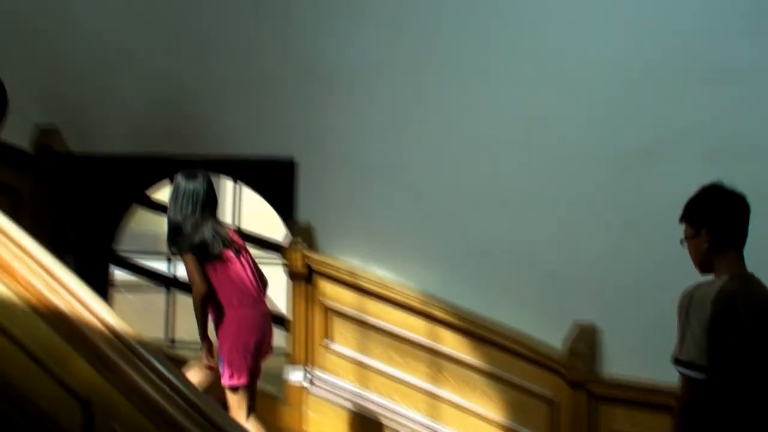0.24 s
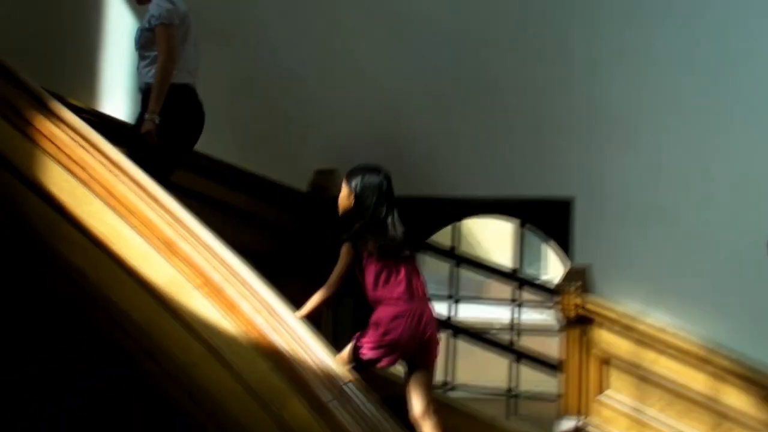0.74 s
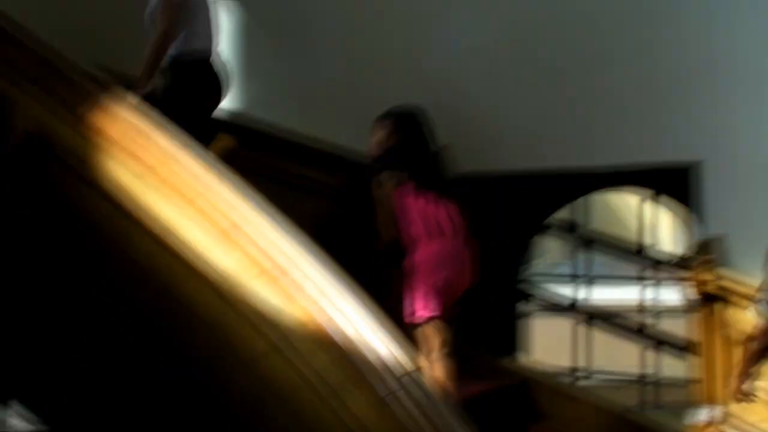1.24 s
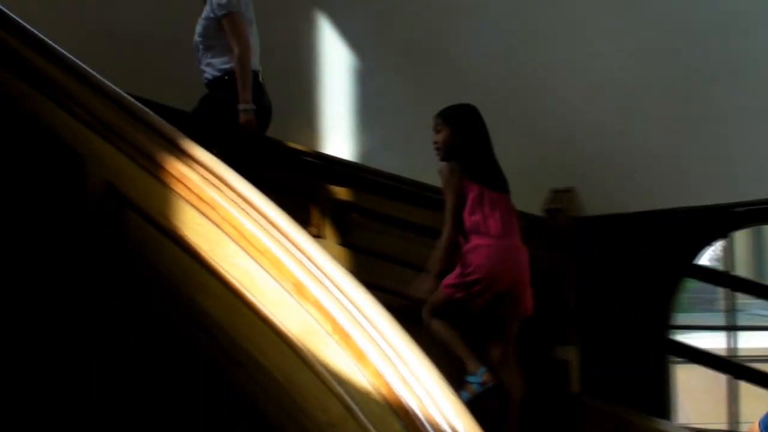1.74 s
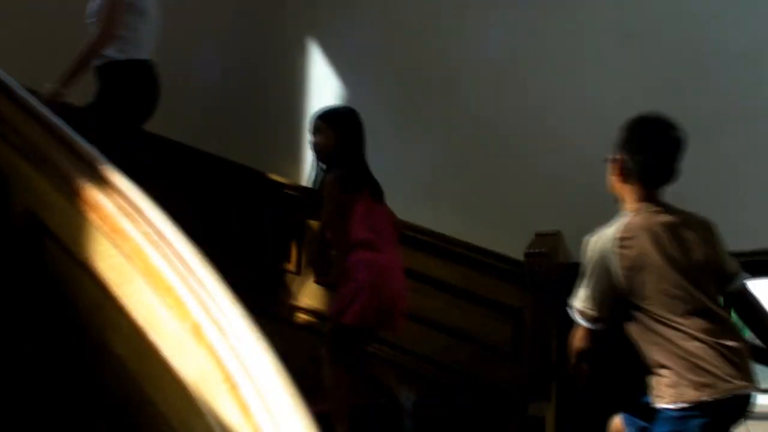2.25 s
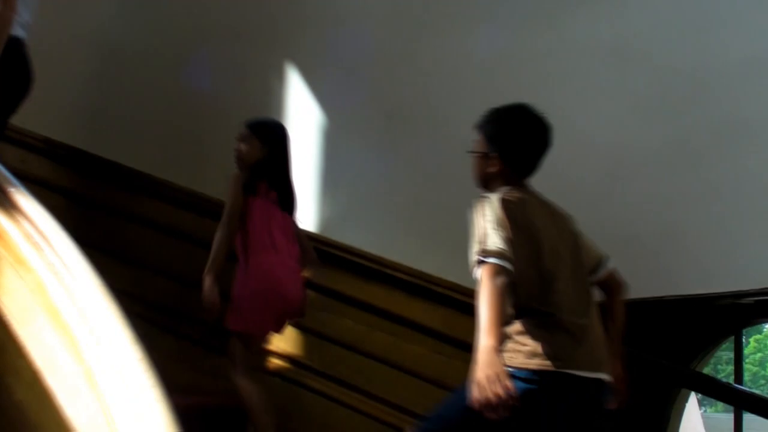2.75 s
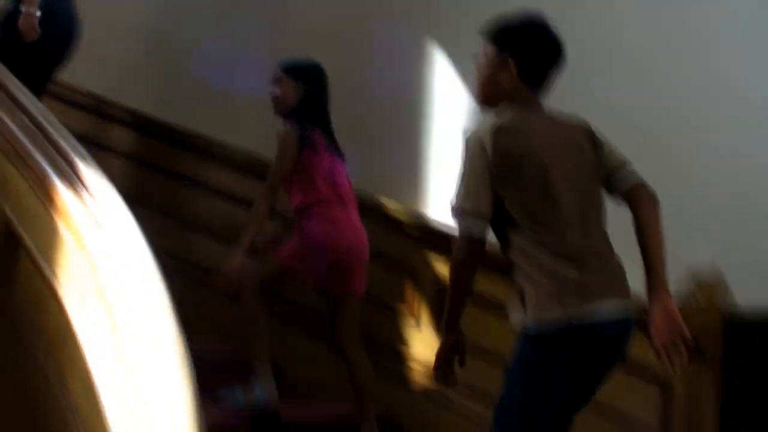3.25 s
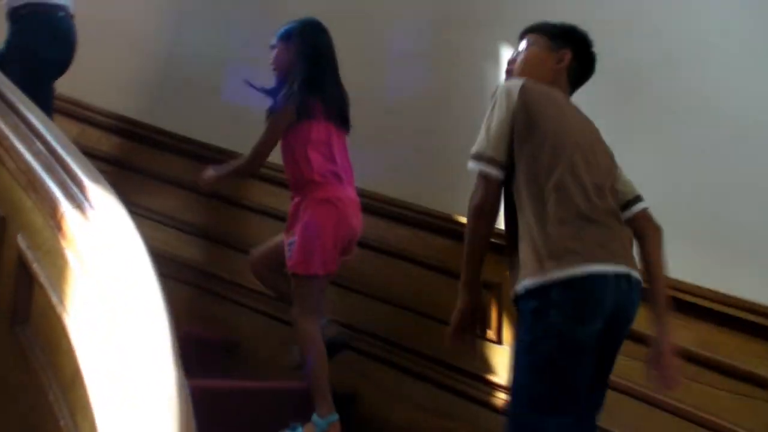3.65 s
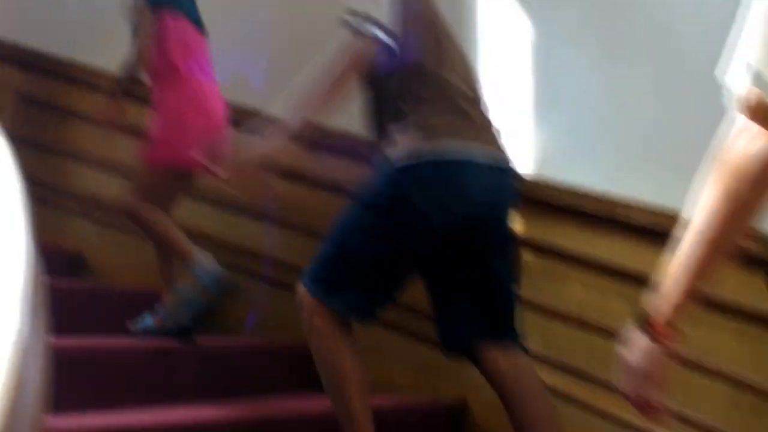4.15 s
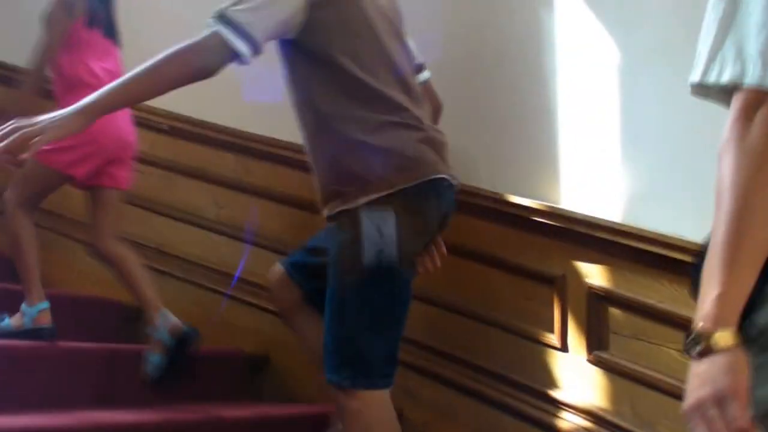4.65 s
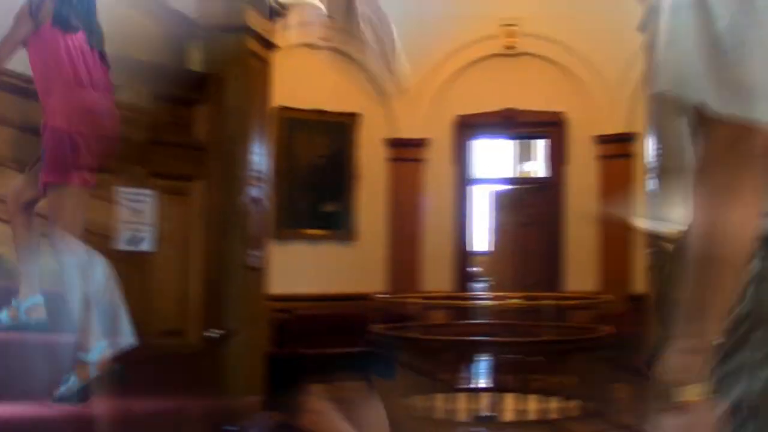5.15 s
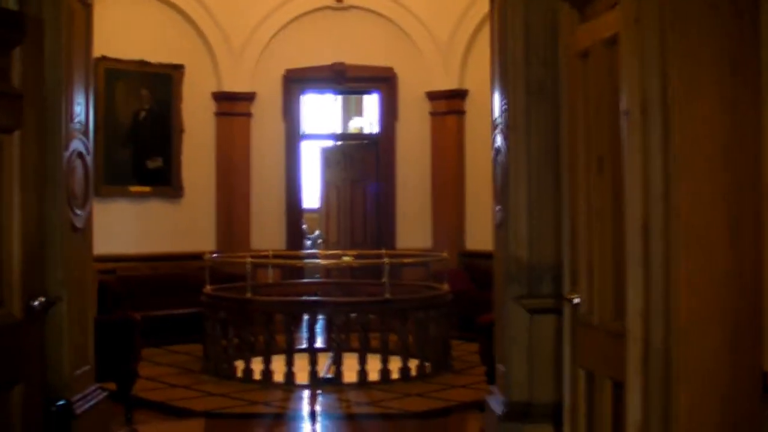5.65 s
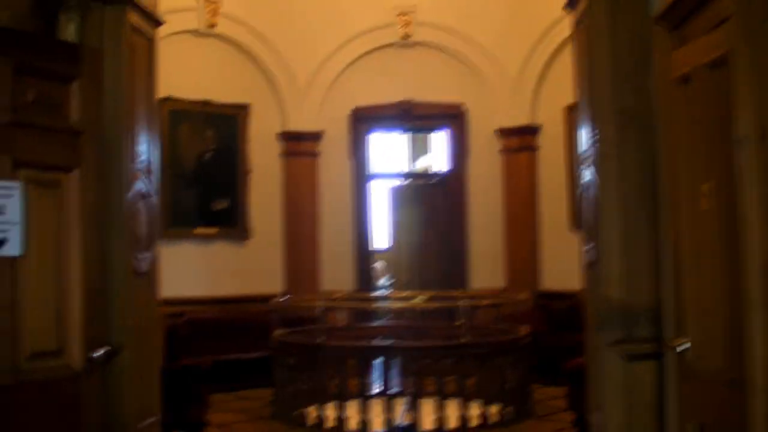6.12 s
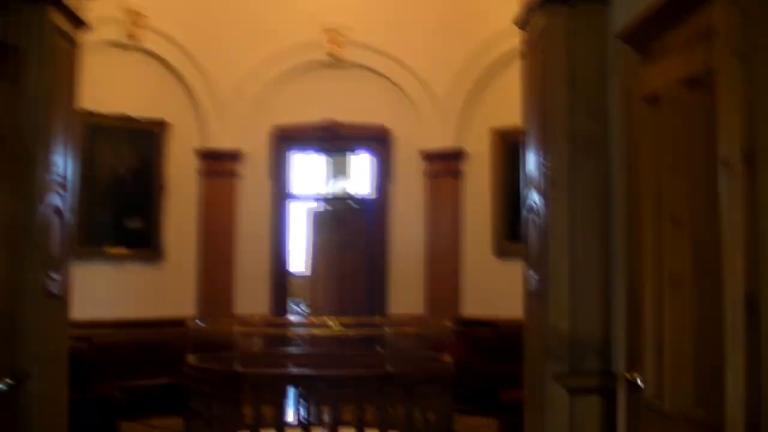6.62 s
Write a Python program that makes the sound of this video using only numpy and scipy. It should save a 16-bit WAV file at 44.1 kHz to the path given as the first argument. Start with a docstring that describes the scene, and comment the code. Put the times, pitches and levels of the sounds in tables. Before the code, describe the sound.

Several people climb a carpeted wooden staircase in a large echoing building, dull hollow footfalls, shoe clacks and scuffs, one heaviest step near five seconds.

```python
"""Footfalls of several people on a carpeted wooden staircase in a large, echoing building: each is a sum of
a noise slap, decaying tread modes (the knock) and decaying modes of the hollow flight (the boom).
Shoes add resonant clacks and ticks, noise scuffs, squeaks, and crunches made of runs of tiny snaps.
Behind them filtered noise gives a dull shuffle and wash, rustles and hiss; decaying noise gives the echo.
The level dips briefly near five seconds, after which the bass is thin and fills in."""
import sys
import numpy as np
from scipy import signal
from scipy.fft import rfft, irfft
from scipy.io import wavfile
from scipy.ndimage import uniform_filter1d

SR = 44100
rng = np.random.default_rng(int(sys.argv[2]) if len(sys.argv) > 2 else 0)


def wav_out(sig):
    """Save sig, one row per channel (or a flat mono array), as 16-bit PCM at SR to the path in sys.argv[1]."""
    wavfile.write(sys.argv[1], SR, np.round(np.clip(np.atleast_2d(sig).T, -1, 1) * 32767).astype(np.int16))


N = 303408
TIME = np.arange(N) / SR
AGE = TIME[:16384]  # seconds since the start of a single event

# Level of the low shuffle and the high rustle behind the steps, with the wash of echo after heavy steps.
# Each row: time in seconds, shuffle and wash in dB, rustle in dB, before gains and wavering.
BACKGROUND_LEVELS = [(0.0, -43, -46.5), (0.4, -45.5, -52.5), (0.75, -41.5, -50), (1.21, -43, -50),
                     (1.77, -45.5, -53), (1.99, -33.5, -46), (2.26, -44.5, -51.5), (2.53, -38.5, -48.5),
                     (3.29, -44.5, -48), (4.25, -44, -52), (4.46, -37, -51), (4.68, -42.5, -53),
                     (5.67, -45, -47.5), (5.92, -43, -54.5), (6.65, -43, -45.5), (6.88, -41.5, -53)]
# Spectrum of the air of the hall. Each row: frequency in Hz, relative density in dB per Hz.
HALL_AIR = [(25, -29), (50, -9), (75, -7), (100, 4.5), (135, 3.5), (185, 3), (260, -5), (400, 6.5),
            (600, -1.5), (1000, -4.5), (2000, -6), (4000, -11.5), (7000, -18), (12000, -34.5), (14500, -36)]
# Centres in Hz of the bands in which the shuffle swells and fades separately.
SHUFFLE_CENTRES_HZ = 2. ** np.arange(8, 11.5, .5)
# Reverberation of the hall. Each row: frequency in Hz, decay time t60 in seconds.
HALL_DECAY = [(100, 1.72), (400, 0.57), (1500, 0.99), (4000, 0.26), (12000, 0.97)]
# Air resonances of the narrow stairwell. Each row: frequency in Hz, peak gain in dB, t60 in seconds.
STAIRWELL_MODES = [(168, -5, 0.65), (404, -2.5, 0.62)]
# Stereo width of the diffuse sound. Each row: frequency in Hz, side gain in dB.
DIFFUSE_SIDE = [(40, -6), (110, -18), (250, -14.5), (500, -13.5), (1000, -12.5), (2000, -7.5), (4000, -3),
                (8000, 0.5)]
# Stereo width of the direct sound. Each row: frequency in Hz, side gain in dB.
DIRECT_SIDE = [(40, -14), (110, -41), (200, -50), (400, -29), (700, -23), (1300, -15), (2400, -12),
               (4400, -3.5), (8000, 0)]
# A shoe squeaks faintly as it turns.
# Each row: loudest moment in seconds, level in dB, length in seconds, pitch in Hz.
SHOE_SQUEAKS = [(.18, -44, .008, 5250), (1.245, -47, .012, 3620), (5.155, -45.5, .055, 1090),
                (6.75, -50, .07, 3500)]
# Soles brush the carpet.
# Each row: loudest moment in seconds, level in dB, rise time in seconds, resonance in Hz.
SOLE_SCUFFS = [(0.278, -45, 0.072, 940), (0.819, -46, 0.15, 3560), (1.243, -47.5, 0.016, 3600),
               (1.412, -48, 0.057, 4660), (1.98, -44, 0.017, 2380), (2.23, -51, 0.013, 13000),
               (2.539, -40, 0.025, 2650), (2.652, -49, 0.068, 900), (2.995, -57, .02, 13000),
               (3.233, -47, 0.018, 2200), (3.238, -52, 0.073, 12000), (3.395, -51, 0.023, 12100),
               (3.794, -38.5, 0.034, 1990), (3.8, -53, 0.026, 12000), (4.406, -40.5, 0.03, 2200),
               (4.472, -38, 0.016, 1800), (4.588, -47, 0.068, 3480), (5.024, -37, 0.0079, 1990),
               (5.116, -39, 0.098, 2470), (5.57, -44, 0.027, 3400), (5.659, -52.5, 0.03, 4160),
               (5.252, -48, 0.079, 950), (5.714, -43.5, 0.14, 1270), (6.121, -42, 0.14, 710),
               (6.206, -52, 0.028, 8900), (6.455, -45.5, 0.077, 3100)]
# Soles crunch as they grip under load.
# Each row: start in seconds, level in dB, length in seconds, middle pitch in Hz.
SOLE_CRUNCHES = [(1.572, -44, .04, 1300), (1.823, -36, 0.063, 1050), (1.925, -41, 0.032, 1100),
                 (1.993, -37, .04, 850), (1.964, -37, 0.068, 1800), (2.117, -47, .04, 1500),
                 (2.589, -39, 0.02, 1500), (2.61, -40.5, .03, 1590), (2.633, -41, 0.095, 1900),
                 (3.224, -41, 0.051, 2000), (3.791, -42, 0.035, 1200), (4.234, -46, .035, 1090),
                 (4.384, -41, 0.057, 1490), (4.46, -44, 0.024, 2200), (5.023, -31, .013, 1880),
                 (5.05, -42, .03, 2200), (5.172, -41, 0.031, 1300), (6.442, -40, 0.087, 3220)]
# Sharp ticks of shoes and small hard things.
# Each row: time in seconds, crack level in dB, ring pitch in Hz, ring against crack in dB,
# brightness of the crack in dB per octave, sharpness Q of the ring.
HARD_TICKS = [(0.1728, -45.5, 5200, -0.5, 15, 11), (.6313, -46.5, 3450, 0, 0, 6),
              (1.884, -34, 4020, -1.5, 5, 3.8), (1.9626, -42, 4300, -6, 0, 4),
              (1.972, -34.5, 3030, -2, -5, 5.1), (1.982, -42, 2310, -4, -6, 5.7),
              (2.522, -35, 3380, -13, 7, 5.4), (2.543, -32.5, 3630, -4, 5, 5),
              (2.6087, -32.5, 2400, 1, 0, 5.9), (2.858, -51, 4200, -5, 12, 5),
              (3.203, -33.5, 2080, -2.5, 2, 10), (3.225, -31.5, 4170, -4, -3.5, 4.7),
              (3.2504, -39, 3960, -8, 9, 4), (3.8005, -39, 3080, -5, 2, 4),
              (4.076, -44.5, 3700, -3, 6.5, 6), (4.413, -36, 3100, -5, -12, 4),
              (4.459, -33.5, 2880, -1.5, 9.5, 5), (4.4745, -45, 2700, -5, 10, 5),
              (4.8792, -35, 1120, 0.5, -5, 9.4), (5.0102, -26.5, 1500, -5, 6, 5.5),
              (5.0263, -31.5, 3000, -11, 3.5, 4), (5.379, -49, 3130, 3.5, -1, 9.6),
              (5.445, -37, 3180, -1.5, -8, 8.8), (5.569, -38.5, 3140, -5, 0, 5.4),
              (6.189, -40, 5000, -1, 9, 6.6), (6.418, -34, 3500, -2.5, 2.5, 15),
              (6.6266, -44, 3540, -2, -1, 10), (6.678, -34, 3480, -0.5, 5.5, 12),
              (6.842, -41.5, 3100, 2, 3, 8.8)]
# Partials of a small hard part. Each row: multiple of the ring pitch, relative drive in dB.
PART_PARTIALS = [(.57, -18), (.88, 6), (1, 17.5), (1.09, -16), (1.6, 2), (2.15, -23)]
# Spectrum of a crack before its tilt. Each row: frequency in Hz, gain in dB.
CRACK_COLOUR = [(200, -15), (900, 25.5), (3500, 6), (7000, -5), (15000, -28)]
# A firm heel or toe clacks on the wood through the carpet. Each row: start in seconds, level in dB, pitch in Hz.
SHOE_CLACKS = [(.218, -45, 516), (.633, -40, 620), (1.0378, -30.5, 384), (1.042, -33, 1240),
               (1.07, -45, 420), (1.567, -39, 855), (1.591, -46, 520), (1.6985, -38.5, 764),
               (1.832, -32, 950), (1.845, -27, 533), (1.883, -26, 370), (1.926, -32.5, 1000),
               (1.986, -25.5, 480), (2.017, -37, 1710), (2.006, -32, 644), (2.13, -32.5, 453),
               (2.6084, -29, 750), (2.617, -40, 680), (2.646, -43, 500), (3.1853, -29, 546),
               (3.224, -37, 1110), (3.792, -30, 1150), (4.2415, -36, 1190), (4.24, -32, 228),
               (4.293, -29, 370), (4.393, -31, 1200), (4.4607, -36, 1010), (4.575, -29, 383),
               (4.597, -37, 710), (5.011, -34, 1700), (5.027, -28.5, 1330), (5.032, -31, 1480),
               (5.19, -34, 605), (6.4191, -29, 447), (6.4244, -28, 422), (6.491, -32.5, 525),
               (6.679, -46, 605)]
# Footfalls. Each row: heel start in seconds, knock level in dB, slap against knock in dB,
# weight on the flight against knock in dB, roll-on time of the heel in seconds,
# brightness of the knock in dB per octave, pitch of the boom in Hz, ball of the foot against heel in dB.
FOOTFALLS = [(.214, -37.5, -6.5, -4, 0.0038, -3, 147, -7), (.502, -38, -5.5, -6.5, 0.0048, 0, 172, -1.5),
             (.626, -38, -7, 0, 0.0065, -2, 156, -5), (.779, -36, -7, 2, 0.012, -20, 105, -10),
             (1.033, -32, -10, -18, 0.0041, -6, 190, -5), (1.565, -39.5, -1, -4.5, 0.0025, -10, 133, -8),
             (1.696, -55, -13, 4, 0.0023, 0, 139, -14), (1.821, -28.5, -13, 2, 0.0099, 8, 169, -5.5),
             (1.921, -31.5, -20, -6.5, 0.0041, -1, 195, -3), (1.98, -28, -17, -1.5, 0.0084, 4, 180, -6),
             (2.119, -32.5, -5.5, -10, 0.0077, -12, 185, -7), (2.416, -38.5, 1.5, 1, 0.002, 21, 135, -9),
             (2.452, -36.5, -19, -2.5, 0.0061, -18, 126, 2.5),
             (2.606, -27, -10.5, -3.5, 0.0016, 8, 138, -6), (2.675, -37, -3, -7, 0.0094, -10, 134, -13),
             (2.931, -36, -16, -8, 0.0035, -4.5, 165, -21), (3.181, -31.5, -8, -2, 0.0031, -8, 149, -5),
             (3.24, -38, 0, 8, 0.0095, 2, 137, -11), (3.545, -41, -11, 0, .0072, -2, 155, -9),
             (3.628, -39, -17, -1, 0.0026, -1, 138, -25), (3.789, -32.5, -18, 3, 0.0038, -14, 123, -8),
             (3.917, -35, -3.5, -3.5, 0.011, 0, 138, -4), (4.237, -27.5, -20, 1.5, 0.0027, -8, 168, -7.5),
             (4.373, -33.5, -3, -2.5, 0.012, -3, 140, -6.5), (4.544, -32.5, -8.5, 2, 0.0046, -22, 178, 0.5),
             (4.876, -36, -2.5, -2.5, 0.0024, 8, 155, -11), (5.002, -23, -10, -10.5, 0.007, -8, 195, -7),
             (5.029, -24.5, -23, -1.5, 0.0036, -3.5, 194, -5.5),
             (6.418, -30.5, -7, -11, .002, 6.5, 181, -8)]
# Modes of a wooden tread. Each row: frequency in Hz, relative level in dB, t60 in seconds.
TREAD_MODES = [(294, -10, 0.039), (362.5, -8.5, 0.11), (403, 0, 0.072), (451, -2.5, 0.062),
               (495, -9.5, 0.1), (546, -8, 0.068), (632, -4.5, 0.047), (745, -3.5, 0.035), (873, -3, 0.024),
               (1060, -32, 0.01)]
# Modes of the hollow flight. Each row: frequency in Hz, relative level in dB, t60 in seconds.
FLIGHT_MODES = [(67.7, -15, 0.16), (93.8, -8, 0.49), (117, -1, 0.15), (148, -3.5, 0.15), (180.5, 1, 0.09),
                (224, -0.5, 0.063), (278, 14, 0.011), (381, 1.5, 0.079)]
# Spectrum of a sole meeting the carpet. Each row: frequency in Hz, gain in dB.
SLAP_COLOUR = [(150, -16), (500, 1.5), (900, -3.5), (1400, -3), (2200, -11.5), (4000, -16), (8000, -21.5),
               (15000, -36)]

SHUFFLE_GAIN_DB, RUSTLE_GAIN_DB = -2, -1
SHUFFLE_WANDER_DB, SHUFFLE_WANDER_PER_S = 2.4, 13
# Brief rustles of clothes and soles further off; their level is set against the shuffle and wash.
RUSTLES_PER_S, RUSTLE_LENGTH_S, RUSTLE_DB, RUSTLE_SPREAD_DB = 14, .018, -5.5, 1.5
RUSTLE_HZ, RUSTLE_SPREAD_OCTAVES = 750, .55
STAIRWELL_Q, SQUEAK_Q = 4.2, 24
GRAINS_PER_S, GRAIN_DB = 320, 19
SLIPS_PER_S, SLIP_SCATTER_DB, SLIP_SPREAD_OCTAVES, SLIP_Q = 420, 3.5, .6, 4
CRUNCH_FADE_DB = -13  # strength falls by this over the run
CRACK_T60_S, TICK_RISE_S = .011, .0007
# The faint after-ring of a tick grows with the sharpness of its ring.
TICK_LINGER_DB, TICK_LINGER_T60_S, LINGER_Q = -21, 0.7, 10
CLACK_Q, CLACK_GRIT_DB, CLACK_T60_S = 1.53, -26.5, 0.038
TREAD_PIVOT_HZ = 450  # the brightness tilt leaves this frequency unchanged
BALL_DELAY_S, BALL_ROLL_S = .028, 0.00788  # the ball of the foot lands after the heel
# The weight lands later when the sole rolls on slowly.
WEIGHT_DELAY_S, WEIGHT_DELAY_PER_ROLL = .002, 1.164
FAR_STRIDE_S, FAR_STRIDE_SPREAD, FAR_STEP_DB = .6, .25, -43.5
# Gain of each source into the reverberation.
STEP_WET_DB, CLACK_WET_DB, CRUNCH_WET_DB, SCUFF_WET_DB, TICK_WET_DB = -10, -8.5, -6.5, -3.5, -5.5
DIP_START_S, DIP_END_S, DIP_DB = 5.086, 5.101, -26
# From the start of the dip the bass is thin, and it fills in after the end.
BASS_EDGE_HZ, BASS_DIP_DB, BASS_RETURN_S = 560, -13, 0.082
TOP_HZ = 15100


def undb(db):
    """Amplitude ratio: 20 dB is a factor of ten."""
    return 10 ** (np.asarray(db) / 20)


def on_log_axis(points, hz):
    """Logarithmic frequency scale: (Hz, value) points are joined by straight lines over it."""
    f, value = np.transpose(points)
    return np.interp(np.log(hz + 1), np.log(f), value)


def colour(x, points):
    """Linear filtering: a (Hz, dB) curve multiplies the spectrum."""
    n = x.shape[-1]
    gain = undb(on_log_axis(points, np.fft.rfftfreq(n, 1 / SR)))
    return irfft(rfft(x) * gain, n)


def resonate(x, hz, q):
    """Simple resonance: a second-order band-pass with gain 1 at its centre."""
    w = 2 * np.pi * min(hz, SR / 2 - 1) / SR
    a = np.sin(w) / (2 * q)
    return signal.lfilter([a, 0, -a], [1 + a, -2 * np.cos(w), 1 - a], x)


def noise(size):
    """Incoherence: unrelated white noise for mid and side."""
    return rng.standard_normal((2, size))


def level(x, db):
    """Mean power: scale the whole signal to an rms level."""
    return x * undb(db) / np.sqrt(np.mean(x ** 2))


def crest(x, db):
    """Short-time power: scale the loudest 8 ms of mid and of side to a level."""
    loudest = uniform_filter1d(x ** 2, SR // 125).max(axis=-1, keepdims=True)
    return x * undb(db) / np.sqrt(loudest)


def fade(t60):
    """Exponential decay: 60 dB in t60 seconds."""
    return np.exp(-np.log(1000) * AGE / t60)


def onset(roll_s):
    """Gradual contact: the sound builds up as the sole rolls on."""
    return 1 - np.exp(-(AGE / roll_s) ** 2)


def walk(rate):
    """Slow random modulation: joined random knots, rate per second, with an rms of 1."""
    knots = rng.standard_normal(N // 100)
    return level(np.interp(TIME * rate, np.arange(len(knots)), knots), 0)


def grit(size, spread_db):
    """Granular friction: noise made of tiny fibre snaps of uneven strength."""
    strength = undb(spread_db * rng.standard_normal(size // 32 + 1))
    return noise(size) * np.repeat(strength, 32)[:size]


def add(track, s, sound):
    """Superposition: sum a sound into the track at a time in seconds."""
    start = max(int(s * SR), 0)
    track[:, start:start + sound.shape[1]] += sound[:, :N - start]


def microphone_hiss():
    """Self-noise: the microphones add steady white noise."""
    return level(noise(N), -56.0)


def wander(x):
    """Band modulation: half-octave bands swell and fade independently."""
    spectrum, octave = rfft(x), np.log2(np.fft.rfftfreq(N, 1 / SR) + 1)
    out = x
    for centre in SHUFFLE_CENTRES_HZ:
        weight = np.clip(1 - 2 * abs(octave - np.log2(centre)), 0, 1)
        band = irfft(spectrum * weight, N)
        out = out + band * (undb(SHUFFLE_WANDER_DB * walk(SHUFFLE_WANDER_PER_S)) - 1)
    return out


def shuffle_and_rustle():
    """Modulated noise: a dull low shuffle and wash, and a fine high rustle, each follow a level curve."""
    s, *columns = np.transpose(BACKGROUND_LEVELS)
    shuffle_db, rustle_db = (np.interp(TIME, s, c) for c in columns)
    low_pass = signal.butter(2, 1800, fs=SR, output="sos")
    air = colour(noise(N), HALL_AIR)
    shuffle = level(wander(signal.sosfiltfilt(low_pass, air)), SHUFFLE_GAIN_DB)
    shuffle = shuffle * undb(shuffle_db + 0.47 * walk(30))
    grains = colour(grit(N, spread_db=1.5), HALL_AIR)
    flutter_db = .8 * walk(45)
    rustle = level(grains - signal.sosfiltfilt(low_pass, grains), RUSTLE_GAIN_DB)
    return shuffle + rustle * undb(rustle_db + flutter_db)


def rustles():
    """Random brushing: resonant grit at chance moments, louder when the shuffle and wash are loud."""
    out, count = np.zeros((2, N)), int(RUSTLES_PER_S * N / SR)
    times, shuffle_db, _ = np.transpose(BACKGROUND_LEVELS)
    starts = rng.random(count) * N / SR
    for s, (size, pitch) in zip(starts, rng.standard_normal((count, 2))):
        hz = RUSTLE_HZ * 2 ** (RUSTLE_SPREAD_OCTAVES * pitch)
        swell = AGE * np.exp(-AGE / RUSTLE_LENGTH_S)
        brush = resonate(grit(len(AGE), spread_db=1), hz, q=5.5) * swell
        db = np.interp(s, times, shuffle_db) + RUSTLE_DB + RUSTLE_SPREAD_DB * size
        add(out, s, crest(brush, db))
    return out


def hall(x, wet_db):
    """Reverberation: panelling and plaster return a dense tail whose octaves decay at their own rates."""
    tail, hz = 0, np.fft.rfftfreq(SR, 1 / SR)
    spectrum, t = rfft(noise(SR)), TIME[:SR]
    for centre in 2. ** np.arange(6, 15):  # octave centres in Hz
        band = irfft(spectrum * np.clip(1 - abs(np.log2((hz + 1) / centre)), 0, 1), SR)
        tail = tail + band * np.exp(-np.log(1000) * t / on_log_axis(HALL_DECAY, centre))
    tail = tail * (1 - np.exp(-t / 0.0029))
    unit_tail = tail / np.sqrt(np.sum(tail ** 2) / 2)
    return undb(wet_db) * signal.fftconvolve(x, unit_tail, axes=1)[:, :N]


def stairwell(x):
    """Room modes: clusters of close air resonances between the panelled walls ring on."""
    rings = 0
    for hz, db, t60 in STAIRWELL_MODES:
        cluster = resonate(resonate(noise(SR), hz, STAIRWELL_Q), hz, STAIRWELL_Q)
        ring = cluster * np.exp(-np.log(1000) * TIME[:SR] / t60)
        rings = rings + undb(db) * ring / abs(rfft(ring)).max(axis=1, keepdims=True)
    return signal.fftconvolve(x, rings, axes=1)[:, :N]


def squeaks():
    """Narrow-band noise: sharp resonances give unsteady tones that swell and die."""
    out = np.zeros((2, N))
    for s, db, length, hz in SHOE_SQUEAKS:
        tone = resonate(resonate(noise(len(AGE)), hz, SQUEAK_Q), hz, SQUEAK_Q)
        swell = np.exp(-(AGE / length - 2) ** 2)
        add(out, s - 2 * length, crest(tone * swell, db))
    return out


def scuffs():
    """Sliding friction: a sole drags over the pile in a swelling hiss with single grains catching."""
    out = np.zeros((2, N))
    for s, db, length, hz in SOLE_SCUFFS:
        swell = (AGE / length * np.exp(1 - AGE / length)) ** 5  # peaks one length after its start
        grains = noise(len(AGE)) * (rng.random(len(AGE)) < GRAINS_PER_S / SR)
        rub = grit(len(AGE), spread_db=3.0) + undb(GRAIN_DB) * grains
        hiss = resonate(resonate(rub, hz, q=0.91), hz, q=0.27)
        add(out, s - length, crest(hiss * swell, db))
    return out


def crunches():
    """Stick-slip: a loaded sole gives a run of tiny snaps, each with its own pitch and strength."""
    out = np.zeros((2, N))
    impulse = np.eye(1, len(AGE) // 32)[0]
    for s, db, length, hz in SOLE_CRUNCHES:
        run = np.zeros((2, len(AGE)))
        for k, (early, size, pitch, side) in enumerate(rng.standard_normal((64, 4))):
            age = abs(k + .4 * early) / SLIPS_PER_S
            if age < length:
                slip_hz = hz * 2 ** (SLIP_SPREAD_OCTAVES * np.clip(pitch, -2, 2))
                slip = resonate(resonate(impulse, slip_hz, SLIP_Q), slip_hz, q=0.31)
                slip_db = SLIP_SCATTER_DB * size + CRUNCH_FADE_DB * age / length
                add(run, age, np.outer([1, side], level(slip, slip_db)))
        add(out, s, crest(run, db))
    return out


def ticks():
    """Hard impact: a noise crack, and a brief rattle that rings the damped partials of a small part."""
    out = np.zeros((2, N))
    for s, db, hz, ring_db, tilt, q in HARD_TICKS:
        tone = [(f, crack_db + tilt * np.log2(f / hz)) for f, crack_db in CRACK_COLOUR]
        crack = colour(noise(len(AGE)), tone) * (fade(CRACK_T60_S) + undb(-13) * fade(0.045))
        linger = undb(TICK_LINGER_DB) * q / LINGER_Q * fade(TICK_LINGER_T60_S)
        rattle = noise(len(AGE)) * (fade(0.029) + linger)
        ring = sum(undb(part_db) * resonate(rattle, k * hz, q) for k, part_db in PART_PARTIALS)
        rise = onset(TICK_RISE_S)
        add(out, s - TICK_RISE_S, crest(crack * rise, db) + crest(ring * rise, db + ring_db))
    return out


def clacks():
    """Damped impulse response: a firm edge of the shoe gives a short pulse with a little grit behind it."""
    out = np.zeros((2, N))
    for s, db, hz in SHOE_CLACKS:
        force = undb(CLACK_GRIT_DB) * noise(len(AGE)) * fade(CLACK_T60_S)
        force[0, 0] += 1
        add(out, s, crest(resonate(resonate(force, hz, CLACK_Q), hz, CLACK_Q), db))
    return out


def strike(modes, lowest_hz, roll_s, settle_db, settle_t60, scatter_db, detune):
    """Modal excitation: a blow and the settling of the sole ring the wood, mixed anew at each blow."""
    force = undb(settle_db) * noise(len(AGE)) * fade(settle_t60)
    force[0, 0] += 1
    ring = 0
    for hz, db, t60 in modes:
        size, shift, sign = rng.standard_normal(3)
        swing = np.sign(sign) * np.sin(2 * np.pi * hz * (1 + detune * shift) * AGE)
        ring = ring + undb(db + scatter_db * size) * fade(t60) * swing
    shake = signal.fftconvolve(force, ring[None], axes=1)[:, :len(AGE)] * onset(roll_s)
    # a board radiates little well below its main modes
    return signal.sosfilt(signal.butter(2, lowest_hz, "high", fs=SR, output="sos"), shake)


def contact(knock_db, slap_db, weight_db, roll_s, tilt, boom_hz):
    """Coupled radiators: the sole slaps, the tread knocks, and the flight booms as it takes the weight."""
    tread = [(hz, db + tilt * np.log2(hz / TREAD_PIVOT_HZ), t60) for hz, db, t60 in TREAD_MODES]
    knock = strike(tread, lowest_hz=286, roll_s=roll_s, settle_db=-28.5, settle_t60=0.23,
                   scatter_db=0.5, detune=0.029)
    # each blow drives the modes of the flight near its own pitch
    flight = [(hz, db - 9 * abs(np.log2(hz / boom_hz)), t60) for hz, db, t60 in FLIGHT_MODES]
    boom = strike(flight, lowest_hz=0.58 * boom_hz, roll_s=0.0055, settle_db=-34.0, settle_t60=0.16,
                  scatter_db=2.0, detune=0.0082)
    late = int((WEIGHT_DELAY_S + WEIGHT_DELAY_PER_ROLL * roll_s) * SR)
    boom = np.pad(boom, ((0, 0), (late, 0)))[:, :len(AGE)]
    slap = colour(grit(len(AGE), spread_db=4.5), SLAP_COLOUR)
    slap = slap * fade(0.16 + 4 * roll_s) * onset(roll_s)
    return crest(knock, knock_db) + crest(slap, knock_db + slap_db) + crest(boom, knock_db + weight_db)


def far_steps():
    """Irregular pulse train: faint footfalls of other walkers at an uneven pace, as footfall rows."""
    rows = []
    for k, early in enumerate(rng.standard_normal(int(N / SR / FAR_STRIDE_S))):
        s = (k + .5 + FAR_STRIDE_SPREAD * early) * FAR_STRIDE_S
        rows.append((s, FAR_STEP_DB, -11, -5, .008, -3, 140, -7.5))
    return rows


def footfalls():
    """Double impact: the heel lands, then the ball of the foot, each exciting slap, tread and flight."""
    out = np.zeros((2, N))
    for s, db, slap_db, weight_db, roll_s, tilt, boom_hz, ball_db in list(FOOTFALLS) + far_steps():
        heel = contact(db, slap_db, weight_db, roll_s, tilt, boom_hz)
        ball = undb(ball_db) * contact(db, slap_db, weight_db, BALL_ROLL_S, tilt, boom_hz)
        add(out, s, heel)
        add(out, s + BALL_DELAY_S, ball)
    return out


def scene():
    """Spatial coherence: a close pair hears near sounds almost alike, the hall and the treble apart."""
    feet, soles, clicks = footfalls(), scuffs(), ticks()
    heels, grips = clacks(), crunches()
    send = undb(STEP_WET_DB) * feet + undb(CLACK_WET_DB) * heels + undb(CRUNCH_WET_DB) * grips
    send = send + undb(SCUFF_WET_DB) * soles + undb(TICK_WET_DB) * clicks
    echo = stairwell(feet) + hall(send, wet_db=0.6)
    direct = feet + heels + grips + soles + clicks
    diffuse = echo + shuffle_and_rustle() + rustles() + squeaks() + microphone_hiss()
    mid = direct[0] + diffuse[0]
    side = colour(direct[1], DIRECT_SIDE) + colour(diffuse[1], DIFFUSE_SIDE)
    return np.array([mid + side, mid - side])


def record(dry):
    """Gain and band limits: the level dips after the heaviest step, the bass returns thin, the top is cut."""
    gap = uniform_filter1d(1. * ((TIME > DIP_START_S) & (TIME < DIP_END_S)), size=64)
    bass = signal.sosfiltfilt(signal.butter(2, BASS_EDGE_HZ, fs=SR, output="sos"), dry)
    recovery = np.exp(-((TIME - DIP_END_S) / BASS_RETURN_S) ** 2)
    bass_db = BASS_DIP_DB * (TIME > DIP_START_S) * recovery
    thinned = dry + bass * (undb(bass_db) - 1)
    top_cut = signal.ellip(8, .2, 70, TOP_HZ, fs=SR, output="sos")
    return signal.sosfilt(top_cut, thinned * undb(DIP_DB * gap))


dry = scene()
out = record(dry)
wav_out(out)
```